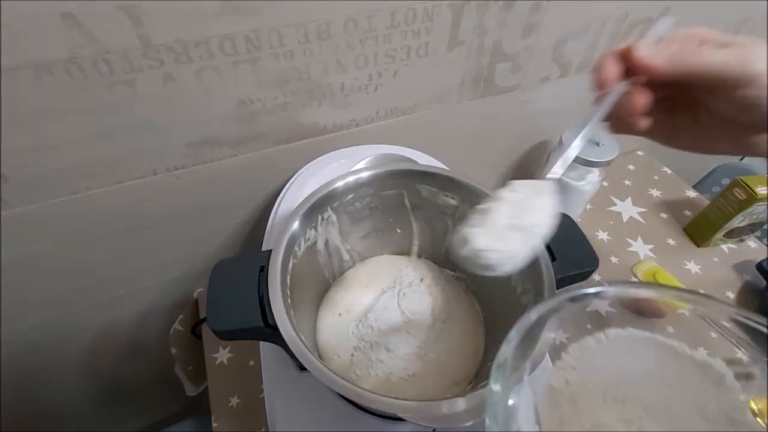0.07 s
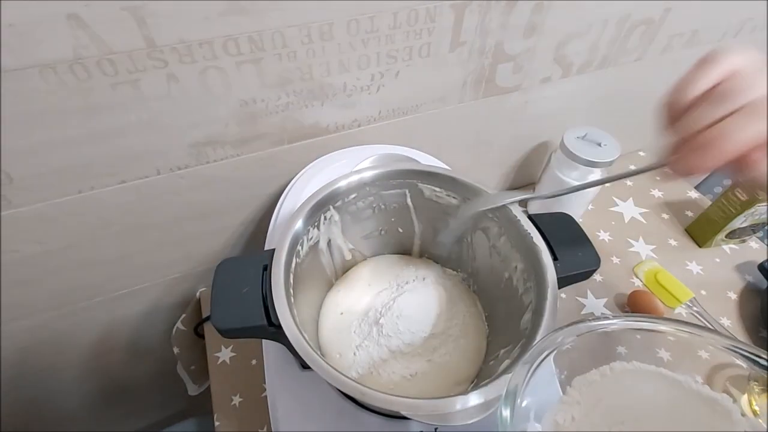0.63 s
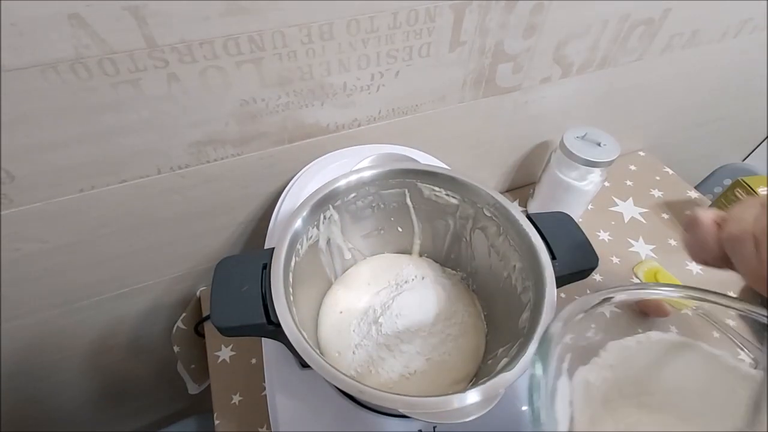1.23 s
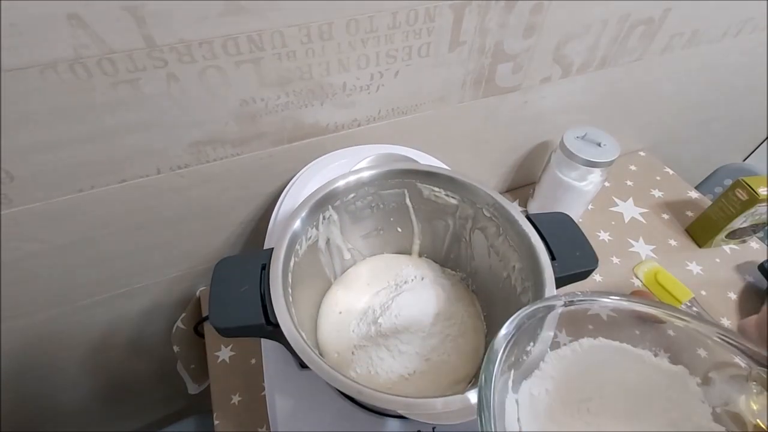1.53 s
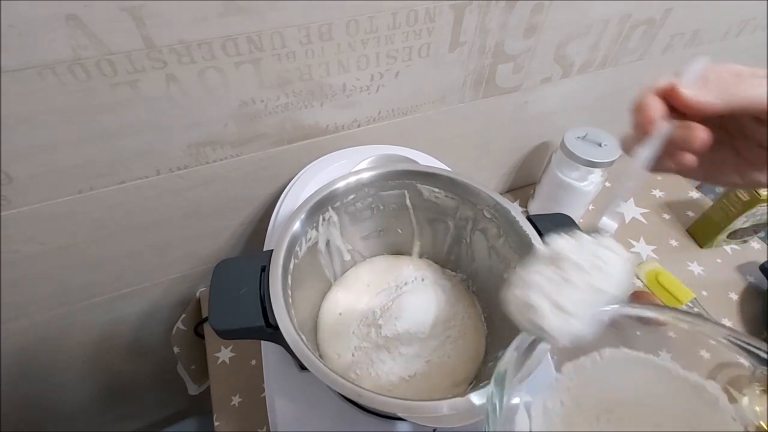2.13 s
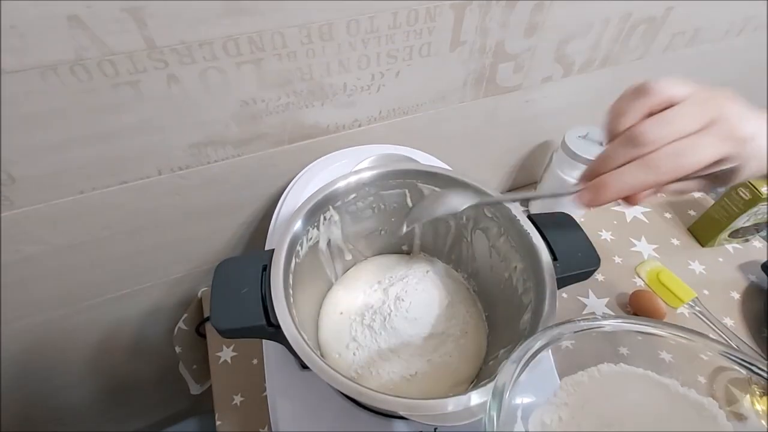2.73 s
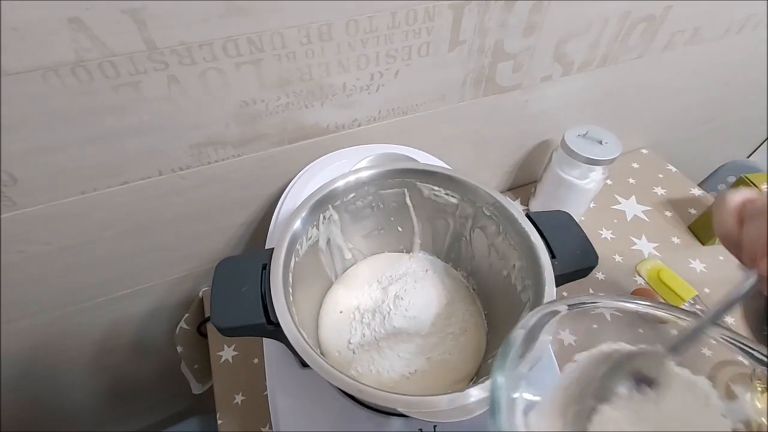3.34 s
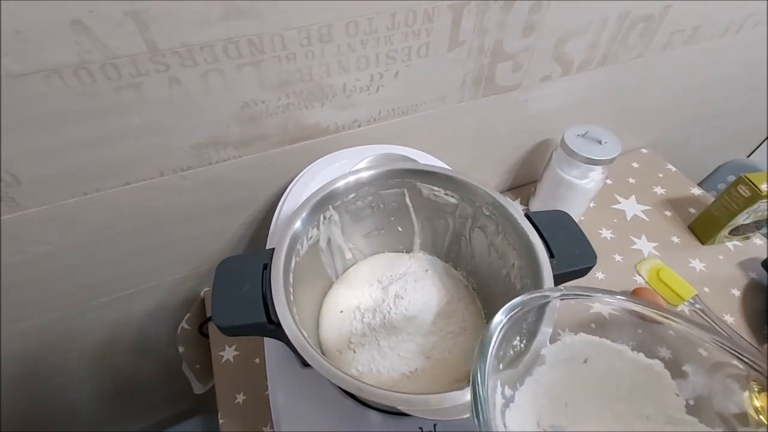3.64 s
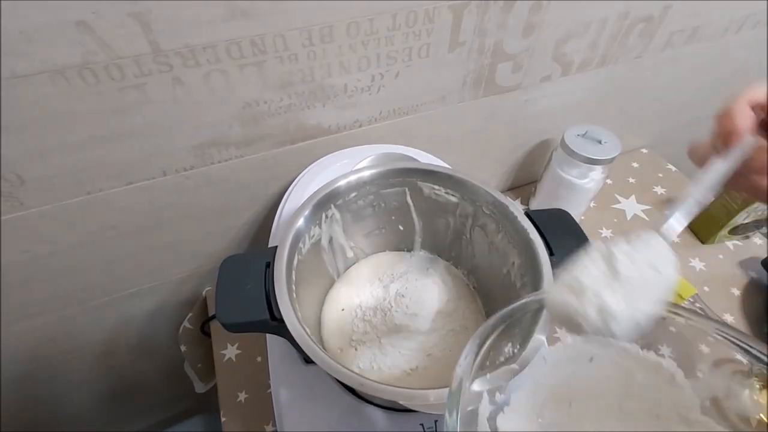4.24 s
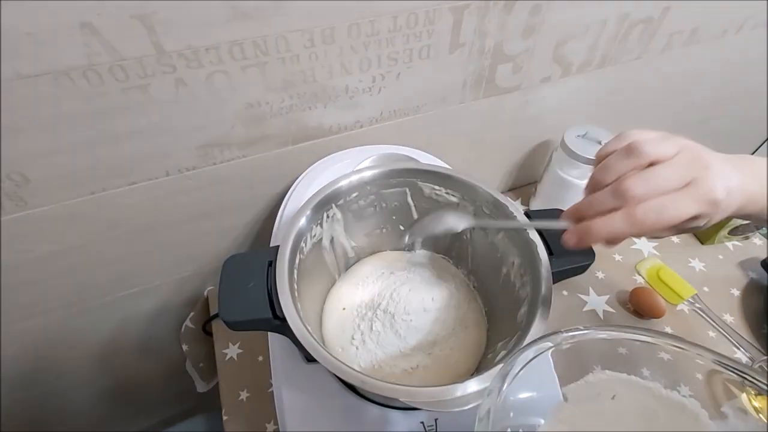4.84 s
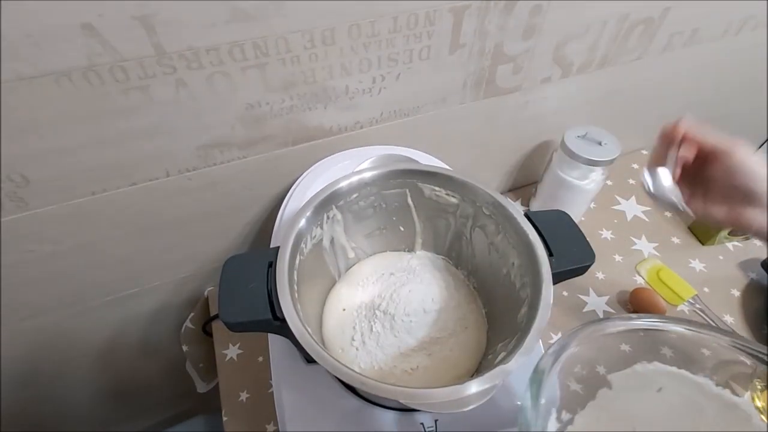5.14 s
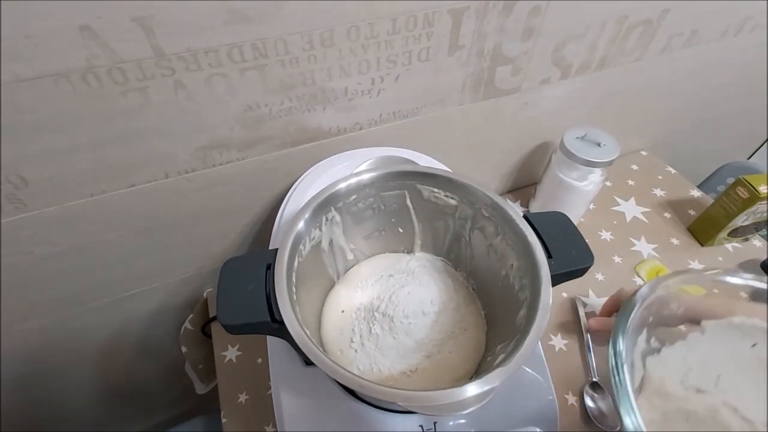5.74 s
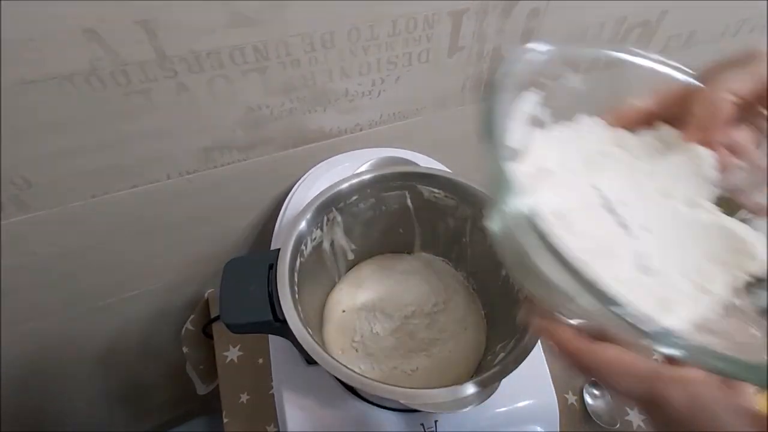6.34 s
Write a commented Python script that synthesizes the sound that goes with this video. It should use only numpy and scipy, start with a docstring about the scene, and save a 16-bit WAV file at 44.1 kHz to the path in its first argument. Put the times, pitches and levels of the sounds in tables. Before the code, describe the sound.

In a small kitchen, a steel spoon taps a glass bowl, scrapes through flour and clinks on the rim. About two seconds later it knocks, skids and rattles on the glass again, with very faint swishes of powder in between. Then the spoon is laid on a cloth-covered table and the heavy bowl bumps it with dull thuds. The sounds are close, over a low appliance hum.

```python
"""A steel spoon goes back twice into a glass bowl of flour: it taps the glass, scrapes through the
flour and drops on the rim, while powder swishes softly over it. Then the spoon is laid on the
cloth-covered table, and the heavy bowl bumps the table and is lifted with faint ticks.
Each hit is ringing modes plus a short crack of noise; scrapes and swishes are swells of shaped noise.
A small kitchen with a low appliance hum answers; two microphone ports listen from close by."""
import sys
import numpy as np
from scipy import signal
from scipy.fft import rfft, irfft, next_fast_len
from scipy.io import wavfile
from scipy.ndimage import map_coordinates

SR = 44100
rng = np.random.default_rng(int(sys.argv[2]) if len(sys.argv) > 2 else 0)


def put_to_file(sound):
    """Save the sound as 16-bit audio at rate SR, in the file named by the first command-line argument."""
    columns = np.atleast_2d(sound).T  # one column per channel
    safe = np.clip(columns, -1, 1)
    whole_steps = np.round(safe * 32767)
    wavfile.write(sys.argv[1], SR, whole_steps.astype(np.int16))


N = 281358

# Hit cues (t/s, level/dB, tilt/dB per octave, accent/dB, accent f/Hz)
GLASS_TAPS = [(0.7496, -31, 1, 5, 4700), (2.891, -49, -7, 7.5, 3400), (6.355, -73.5, -10, 16.5, 6630)]  # spoon tip on the glass
RIM_CLINKS = [(1.137, -21, -5.5, 12, 4960), (1.141, -25.5, 0, 13.5, 2590), (1.212, -40, -4, 13, 5000),
              (3.1604, -18.5, -2, -8, 2170), (3.275, -28.5, -2.5, 12, 4330), (3.29, -48, -7, 12.5, 4050)]  # spoon drops on the rim and rattles
DULL_KNOCKS = [(0.101, -78.5, -17, -4), (0.7797, -30, -4, 8.5), (1.093, -47.5, -6, -9),
               (3.029, -31.5, -5, 11), (3.032, -40.5, -6, 4), (3.305, -41.5, -5.5, 12),
               (6.285, -65.5, -4.5, -10.5), (6.31, -63.5, -4.5, -8), (6.321, -63, -8, -15)]  # spoon and bowl, damped; no accent f column
TABLE_THUDS = [(5.3517, -21, -1.14), (5.533, -17, 1), (5.606, -22, -.5), (5.646, -28.5, 2.5)]  # blows on the table; no accent columns
# The held bowl rings as it bumps the table (t/s, level/dB)
BOWL_BUMPS = [(5.535, -63.5), (5.607, -57.5)]
# Stroke cues (t/s at full force, hold/s, level/dB)
FLOUR_SWISHES = [(.68, 0.054, -69.5), (1.68, 0.028, -77.5), (2.69, 0.037, -73.5), (3.69, 0.06, -69.5),
                 (4.64, 0.099, -74), (4.88, 0.15, -80.5), (5.18, 0.033, -78)]  # flour slips over the spoon
FLOUR_DIGS = [(1.005, .03, -41.5)]  # spoon digs through flour on the glass
WALL_SKIDS = [(2.93, 0.1634, -61), (3.121, .02, -50.5), (3.148, .015, -40)]  # it skids on the bowl's wall
RIM_SLIDES = [(3.18, .06, -36), (3.29, 0.067, -52)]  # loose, it slides along the rim
FLOUR_SCOOPS = [(3.5, .12, -76)]  # it ploughs through deep flour

# Modes of each struck body (f/Hz, level/dB, t60/s before the grip shortens it)
DAMPED_MODES = [(338, -12.5, 0.065), (672, -12.5, 0.092), (1015.5, -5, 0.057), (2190, 0, 0.02),
                (3714, 1, 0.016), (4190, -10.5, .06), (11680, -7.5, 0.12)]
GLASS_MODES = [(824, -7, .15), (953, 2, .18), (1620, -15, .3), (2083, 4, .38), (3505, 0, .36),
               (3900, -1, .03), (4312, -11, .35), (5259, 1, .27), (5895, -14, .35), (7332, -11, .25),
               (8699, -12, .22), (8990, -15, .28), (9755, -4, .1), (10210, 2, .32), (10620, -13, .2),
               (11700, -5, .26), (12360, -14, .28), (14050, -15, .22), (14883, 1, .15), (15300, -13, .2)]
SPOON_MODES = [(330, -19, .08), (620, -8, .04), (1696, -10, .07), (2121, -11, .12), (2257, -5, .17),
               (2286, -9, .2), (2358, -12, .18), (3343, -11, .12), (3531, -9, .12), (3661, -6, .14),
               (3738, -2, .17), (3865, -8, .14), (4048, -11, .14), (4549, -14, .15), (5290, -5, .2),
               (5354, -5, .22), (7389, -4.5, .13), (7617, -11, .1), (8720, -14, .2), (9800, -7, .06),
               (10210, -14, .18), (11680, -12, .14), (12410, -9, .18), (14120, -18, .15), (15350, -12, .13)]
TABLE_MODES = [(97, -5, .38), (123, -4, .42), (150, -2, .36), (178, -3, .26), (262, 0, .42), (300, -2, .44),
               (322, -8, .35), (354, -5, .36), (407, -8, .4), (533, -7, .45), (602, -8, .4), (643, -5, .5),
               (695, -8, .35), (781, -9, .4), (860, -11, .35), (931, -20, .4), (1216, -14, .4),
               (1287, -15, .38), (1840, -23, .3), (2300, -24, .22)]
# Partials of the gripped bowl (f/Hz, level/dB, t60/s)
BOWL_PARTIALS = [(3079, 0, .32), (4339, 3, .31), (7838, -21, .4)]
# Resonances of the rubbing spoon, held or loose (f/Hz, width/Hz, peak/dB over the hiss)
HELD_RESONANCES = [(1250, 130, 11), (2600, 90, 3), (2950, 110, 4), (3950, 140, 1), (4750, 220, 13),
                   (7700, 400, 0), (12300, 400, 9)]
LOOSE_RESONANCES = [(2280, 110, 2), (3740, 130, 10), (5330, 70, 17), (7390, 70, 12)]
# Partials of the appliance hum (f/Hz, relative level/dB)
HUM_PARTIALS = [(48.4, -87.5), (134.6, -83.5), (269.2, -79.5), (301.5, -84.5), (516.8, -86), (866.7, -87.5)]

# Crack of a hit: the body's crowd of weak, close modes (f/Hz, relative density/dB)
DULL_CRACK = [(60, -22), (200, -9.5), (350, 5.5), (1000, 3), (1500, 1), (4000, -4.5), (8000, -7),
              (16000, -13)]
BRIGHT_CRACK = [(60, -30), (250, -13), (700, -7), (2000, 5.5), (2900, -8), (3800, 6.5), (5400, -3.5),
                (6500, -8), (9500, -1), (13000, -13), (16000, -5.5)]
WOODEN_CRACK = [(35, -29), (70, -24.5), (110, -0.5), (170, -2), (210, -3), (300, 7.5), (450, -0.5),
                (700, 4), (1000, -6), (1350, -6), (1700, -15.5), (2300, -18), (3000, -35.5), (5500, -40.5),
                (9000, -63), (16000, -56.5)]
# Noise colours of the room air and of each stroke (f/Hz, relative density/dB)
AIR_COLOUR = [(20, -11), (48, -1.5), (85, -14), (138, -4), (210, -11), (300, -1.5), (400, -12),
              (700, -18.5), (900, -20.5), (1500, -31), (2200, -32), (3100, -42), (5000, -37.5),
              (6400, -45.5), (16000, -42.5)]
SWISH_COLOUR = [(500, -12.5), (1050, 1.5), (1450, -14.5), (2200, -11), (3400, -23.5), (4700, -6.5),
                (6200, -21.5), (9000, -30.5), (15500, -29)]
DIG_COLOUR = [(300, -24), (800, -12), (1300, -12.5), (1800, -20.5), (2800, -12.5), (4000, -11.5),
              (5200, -10), (5800, -19), (6500, -16.5), (9300, -19), (10200, -25.5), (12500, -18.5),
              (14000, -27.5), (15700, -20)]
SKID_COLOUR = [(200, -23), (700, -20.5), (2200, -9.5), (3000, -16.5), (4000, -0.5), (6000, -19),
               (7500, -4.5), (9000, -20.5), (12000, -12), (14000, -21.5), (15800, -12.5)]
SLIDE_COLOUR = [(300, -22.5), (700, -14.5), (1700, -13), (2900, -5), (4600, -6), (5300, -1.5), (5900, -24),
                (7500, -19), (10000, -24.5), (15800, -23.5)]
SCOOP_COLOUR = [(1000, -11.5), (3200, -16.5), (4400, -5.5), (5400, 2), (6200, -11), (7000, -29.5),
                (15000, -17)]

# Decay of the kitchen's tail (f/Hz, t60/s)
KITCHEN_DECAY = [(100, 0.37), (500, 0.41), (2200, 0.42), (5000, 0.4), (9000, 0.43), (15000, 0.22)]
# How alike the two ports hear the scene (f/Hz, left-right correlation)
PORT_LIKENESS = [(100, .99), (300, .92), (700, .75), (1500, .4), (4000, .1), (12000, -.1)]
# Tonal difference between the ports (f/Hz, left minus right/dB)
PORT_BALANCE = [(100, -.5), (300, -2), (900, -1.5), (2100, 3), (3000, -2), (4400, 1), (5400, -4), (6200, 0),
                (7300, 11), (8600, -1), (10200, 2), (15000, -3)]


def amp(db):
    """Decibels to gain."""
    return 10 ** (np.asarray(db) / 20)


def unit(x):
    """Scale to rms 1."""
    return x / np.sqrt(np.mean(x ** 2) + 1e-20)


def along(points, hz):
    """Read a curve of (f/Hz, value) points on a log axis."""
    f, value = np.transpose(points)
    return np.interp(np.log(hz + 1), np.log(f + 1), value)


def wobble(rate_hz):
    """A smooth random modulator with rate_hz knots a second."""
    knots = rng.standard_normal(int(N * rate_hz / SR) + 4)
    return map_coordinates(knots, [np.arange(N) * rate_hz / SR])


def filtered(x, response):
    """Equalise x with a gain given as a function of frequency."""
    n = x.shape[-1]
    size = next_fast_len(n + 8192)
    return irfft(rfft(x, size) * response(np.fft.rfftfreq(size, 1 / SR)), size)[..., :n]


def spread(hz):
    """Stereo width as a mid-side angle in radians: 0 is mono."""
    return np.arccos(along(PORT_LIKENESS, hz)) / 2


def paired(x):
    """Two unrelated signals become left and right: alike in the bass, wide in the treble."""
    mid, side = filtered(x, lambda hz: np.array([np.cos(spread(hz)), np.sin(spread(hz))]))
    return np.array([mid + side, mid - side])


def noise(colour, size):
    """Coloured stereo noise of rms 1."""
    white = paired(rng.standard_normal((2, size)))
    return unit(filtered(white, lambda hz: amp(along(colour, hz))))


def add(track, at_s, x):
    """Mix x into the track at its cue."""
    start = round(at_s * SR)
    track[:, start:start + x.shape[1]] += x[:, :N - start]


def kitchen(x, near_db, room_db, near_t60=0.079, build_s=0.012):
    """Reverb return: quick reflections from bowl, table and wall, then the room's tail."""
    wash = paired(rng.standard_normal((2, SR * 2 // 3)))
    hz, frame_s, bands = signal.stft(wash, SR, nperseg=256)
    decay = amp(-60 * frame_s / along(KITCHEN_DECAY, hz)[:, None])
    tail = signal.istft(bands * decay, SR, nperseg=256)[1]
    t = np.arange(tail.shape[1]) / SR
    near = paired(rng.standard_normal(tail.shape)) * amp(-60 * t / near_t60)
    onset = 1 - np.exp(-(t / build_s) ** 2)
    impulse = (amp(near_db) * unit(near * onset) + amp(room_db) * unit(tail * onset)) / np.sqrt(len(t))
    return signal.fftconvolve(x, impulse, axes=1)[:, :x.shape[1]]


def contact(level_db, tilt_db, accent_db=0, accent_hz=3600):
    """EQ of one hit: a harder contact is brighter, and the spot struck accents or mutes one region."""
    flat_below_hz, pivot_hz, accent_octaves = 700, 2500, 0.46

    def gain(hz):
        hz = np.maximum(hz, flat_below_hz)
        accent = np.exp(-(np.log2(hz / accent_hz) / accent_octaves) ** 2)
        return amp(level_db + tilt_db * np.log2(hz / pivot_hz) + accent_db * accent)
    return gain


def hit(modes, crack_colour, eq, ring_db, crack_db, crack_t60, attack_s, grip):
    """Two layers of a hit: a ring of clear modes, dying grip times faster, and a crack of weak ones."""
    t = np.arange(SR * 4 // 5) / SR
    hz, db, t60 = np.transpose(modes)[:, :, None]
    apart = spread(hz) * rng.choice([-1, 1], hz.shape)  # high modes reach the ports in different phases
    phase = 2 * np.pi * (hz * t + rng.random(hz.shape))
    envelope = eq(hz) * amp(db + ring_db - 60 * t * grip / t60)
    ring = np.array([(envelope * np.sin(phase + side * apart)).sum(0) for side in (1, -1)])
    crack = filtered(noise(crack_colour, len(t)), eq) * amp(crack_db - 60 * t / crack_t60)
    return np.array([ring, crack]) * (1 - np.exp(-t / attack_s))


def strokes(cues, rise_db_per_s, fall_db_per_s):
    """Gain envelope in which every stroke swells, holds and fades."""
    t = np.arange(N) / SR
    envelope = np.zeros(N)
    for at_s, hold_s, db in cues:
        before, after = np.maximum(at_s - t, 0), np.maximum(t - at_s - hold_s, 0)
        envelope += amp(db - rise_db_per_s * before - fall_db_per_s * after)
    return envelope


def room_tone(air_db=-68, drift_db=.6, hum_trim_db=-1, waver_rad=.5):
    """A bed of soft, diffuse air and the slightly unsteady hum of an appliance off to the right."""
    t = np.arange(N) / SR
    hum = np.zeros(N)
    for hz, db in HUM_PARTIALS:
        phase = 2 * np.pi * hz * t + waver_rad * wobble(2.7)
        hum += amp(db + hum_trim_db) * np.sqrt(2) * np.sin(phase)
    air = noise(AIR_COLOUR, N)
    air = unit(air + amp(-6) * (air - air[::-1]))  # widen the image
    air *= amp(air_db + drift_db * wobble(2.4))
    return (air + hum) * amp([[-2], [2]])  # lean right


def dull_knocks():
    """Spoon and bowl knock, so damped by flour and hand that they hardly ring."""
    track = np.zeros((2, N))
    for at_s, *touch in DULL_KNOCKS:
        ring, crack = hit(DAMPED_MODES, DULL_CRACK, contact(*touch),
                          ring_db=-2.5, crack_db=2, crack_t60=0.034, attack_s=0.00088, grip=1.05)
        add(track, at_s, ring + crack + kitchen(ring + crack, near_db=-15.5, room_db=-9.5))
    return track


def flour():
    """Powder hisses softly as the spoon ploughs through it and as it slips over the steel."""
    scoop = strokes(FLOUR_SCOOPS, rise_db_per_s=150, fall_db_per_s=15.5) * noise(SCOOP_COLOUR, N)
    swish = strokes(FLOUR_SWISHES, rise_db_per_s=215, fall_db_per_s=151) * noise(SWISH_COLOUR, N)
    return scoop + swish


def glass_taps():
    """The spoon's tip sets the glass ringing brightly."""
    track = np.zeros((2, N))
    for at_s, *touch in GLASS_TAPS:
        ring, crack = hit(GLASS_MODES, BRIGHT_CRACK, contact(*touch),
                          ring_db=-5, crack_db=4.5, crack_t60=.085, attack_s=0.00067, grip=1.2)
        add(track, at_s, ring + crack + kitchen(crack + amp(-4) * ring, near_db=-10, room_db=-3.5))
    return track


def friction(envelope, colour, resonances, grit_db, stick_db, stick_hz=100, slips_per_s=1500):
    """A hiss gritty with tiny slips; the spoon sticks and lets go, and its resonances sing along."""
    slips = (rng.random(N) < slips_per_s / SR) * rng.standard_normal((2, N))
    rasp = rng.standard_normal((2, N)) + amp(grit_db) * unit(slips)
    rasp *= amp(stick_db * wobble(stick_hz))

    def body(f):
        singing = 1 + sum(amp(db) / (1 + (2 * (f - hz) / width) ** 2) for hz, width, db in resonances)
        low_cut = f ** 2 / (f ** 2 + 250 ** 2)  # a spoon radiates no bass
        return amp(along(colour, f)) * singing * low_cut
    return envelope * unit(filtered(paired(rasp), body))


def scrapes():
    """The spoon digs into the flour, skids on the glass and slides down the rim."""
    dig = friction(strokes(FLOUR_DIGS, rise_db_per_s=172.5, fall_db_per_s=189),
                   DIG_COLOUR, HELD_RESONANCES, grit_db=-1, stick_db=2.8)
    skid = friction(strokes(WALL_SKIDS, rise_db_per_s=752.5, fall_db_per_s=1000),
                    SKID_COLOUR, [], grit_db=-4, stick_db=4.6)
    slide = friction(strokes(RIM_SLIDES, rise_db_per_s=1602, fall_db_per_s=418.5),
                     SLIDE_COLOUR, LOOSE_RESONANCES, grit_db=-4.5, stick_db=0.5)
    rubbing = dig + skid + slide
    return rubbing + kitchen(rubbing, near_db=-9.5, room_db=-13)


def rim_clinks():
    """The spoon drops on the rim and rattles, its steel ringing briefly."""
    track = np.zeros((2, N))
    for at_s, *touch in RIM_CLINKS:
        ring, crack = hit(SPOON_MODES, BRIGHT_CRACK, contact(*touch),
                          ring_db=-2.5, crack_db=0.5, crack_t60=0.031, attack_s=0.00078, grip=2)
        add(track, at_s, ring + crack + kitchen(crack + amp(-3) * ring, near_db=-8.5, room_db=-9.5))
    return track


def table_thuds():
    """The cloth softens each blow, so mostly the table top booms into the room."""
    track = np.zeros((2, N))
    for at_s, *touch in TABLE_THUDS:
        ring, crack = hit(TABLE_MODES, WOODEN_CRACK, contact(*touch),
                          ring_db=-6.5, crack_db=1, crack_t60=0.086, attack_s=0.00094, grip=1.25)
        add(track, at_s, ring + crack + kitchen(crack + amp(-13.5) * ring, near_db=-11.5, room_db=0.5))
    return track


def bowl_ring():
    """Gripped and full of flour, the bumped bowl keeps only a few thin partials."""
    track = np.zeros((2, N))
    t = np.arange(SR * 2 // 3) / SR
    for at_s, bump_db in BOWL_BUMPS:
        ring = np.zeros((2, len(t)))
        for hz, db, t60 in BOWL_PARTIALS:
            phase = 2 * np.pi * (hz * t + rng.random((2, 1)) / 4)
            ring += amp(bump_db + db - 60 * t / t60) * np.sin(phase)
        add(track, at_s, ring + kitchen(ring, near_db=-9, room_db=-9))
    return track


def scene():
    """The mix: spoon, flour, table and bowl over the room tone."""
    spoon = glass_taps() + rim_clinks() + dull_knocks() + scrapes()
    return spoon + flour() + table_thuds() + bowl_ring() + room_tone()


def record(dry):
    """The microphone sheds the deep bass and the very top, and each port has its own colour."""
    low_cut_hz, top_hz, edge_hz = 38, 15950, 250
    thinned = signal.sosfilt(signal.butter(3, low_cut_hz, "high", fs=SR, output="sos"), dry)

    def ports(hz):
        high_cut = np.clip((top_hz - hz) / edge_hz + .5, 0, 1)
        return amp(np.outer([.5, -.5], along(PORT_BALANCE, hz))) * high_cut
    return filtered(thinned, ports)


dry = scene()
out = record(dry)
put_to_file(out)
```